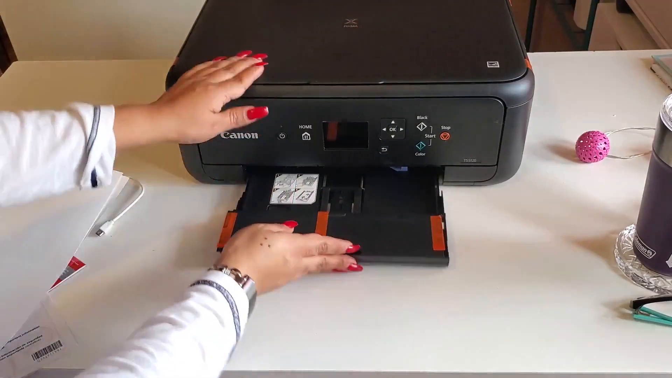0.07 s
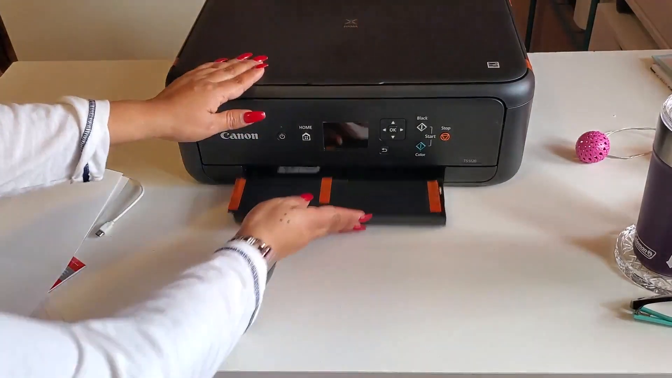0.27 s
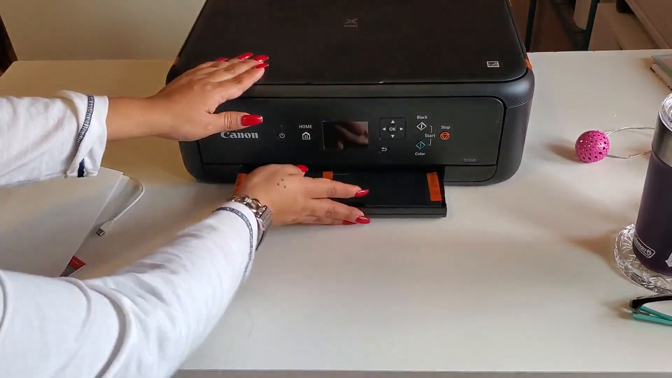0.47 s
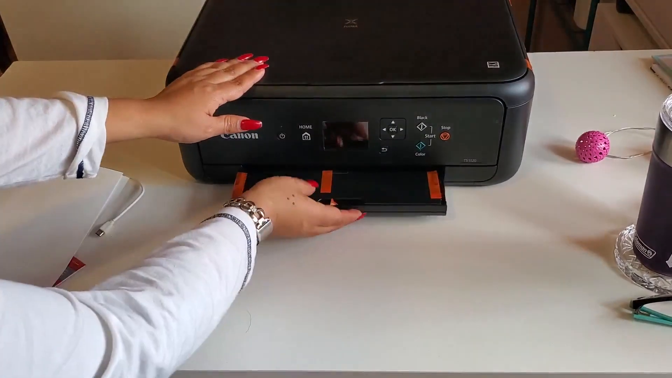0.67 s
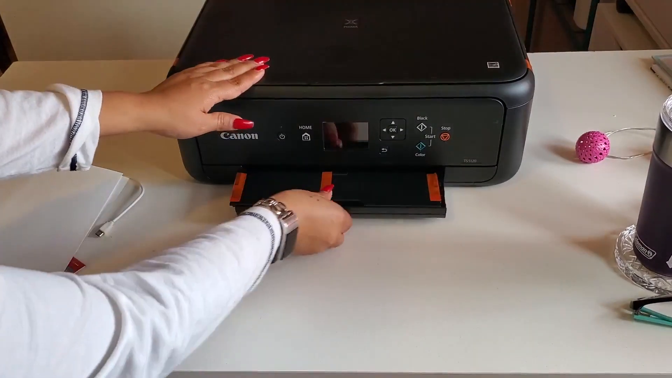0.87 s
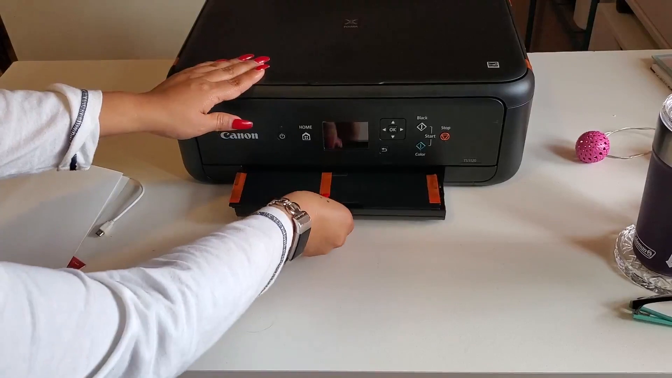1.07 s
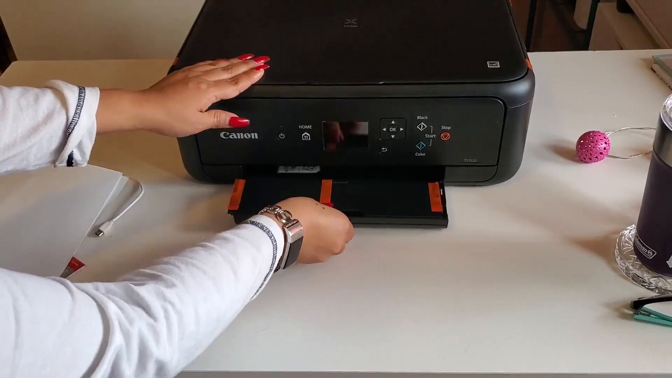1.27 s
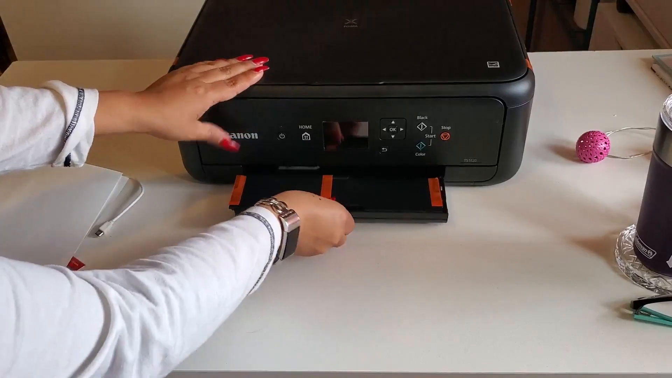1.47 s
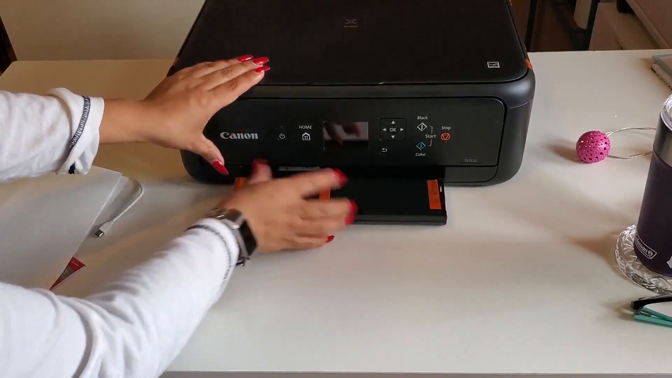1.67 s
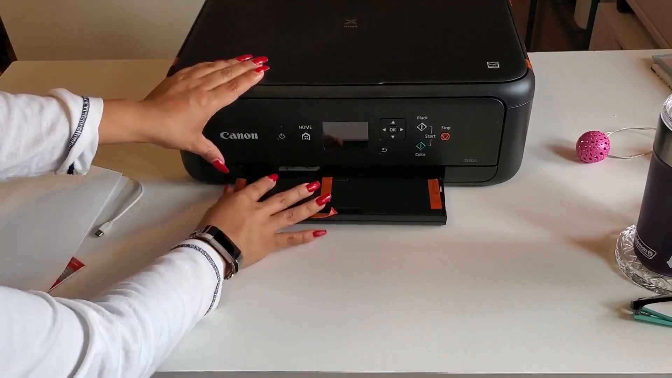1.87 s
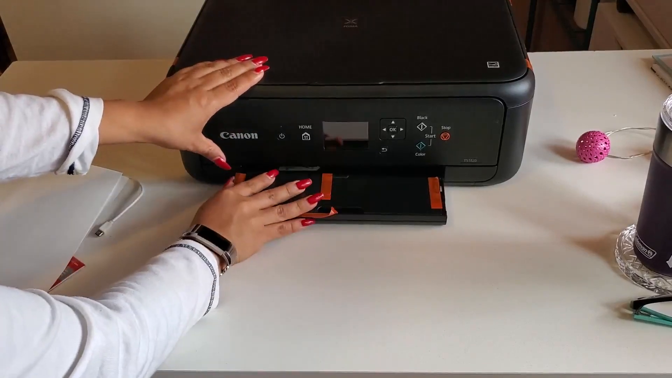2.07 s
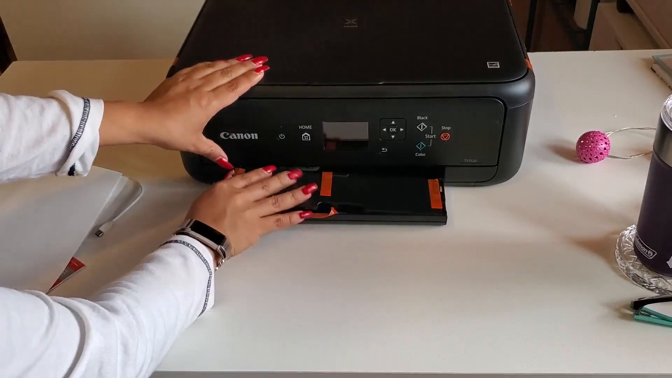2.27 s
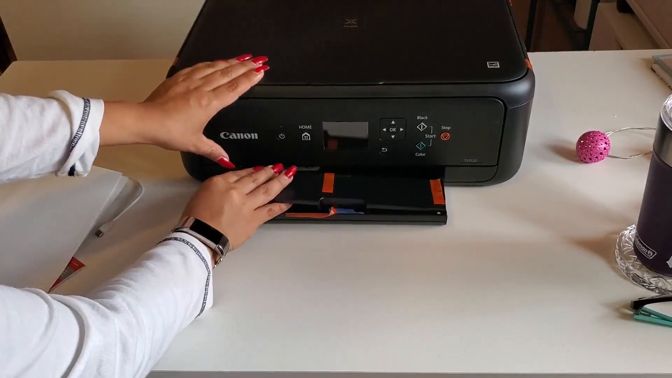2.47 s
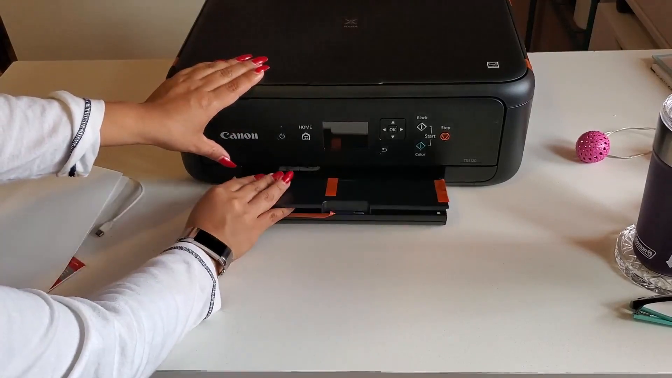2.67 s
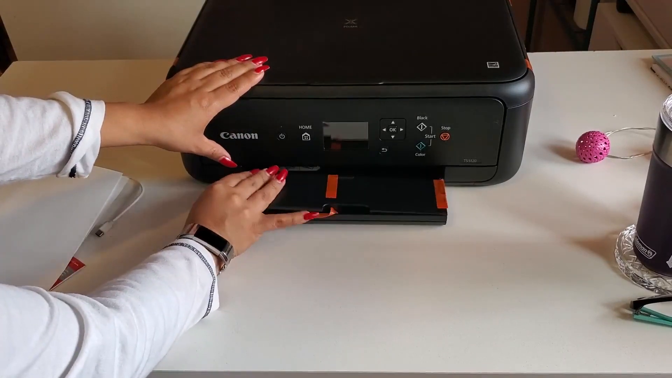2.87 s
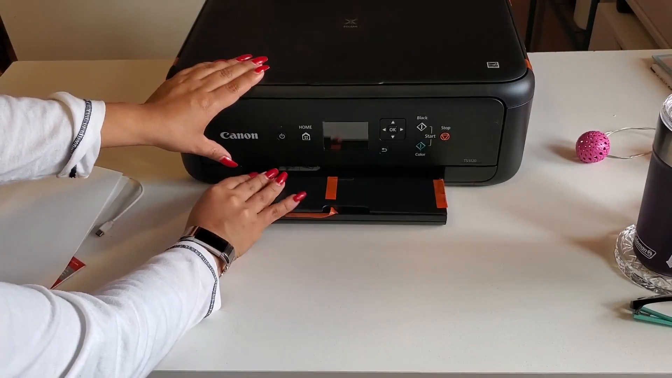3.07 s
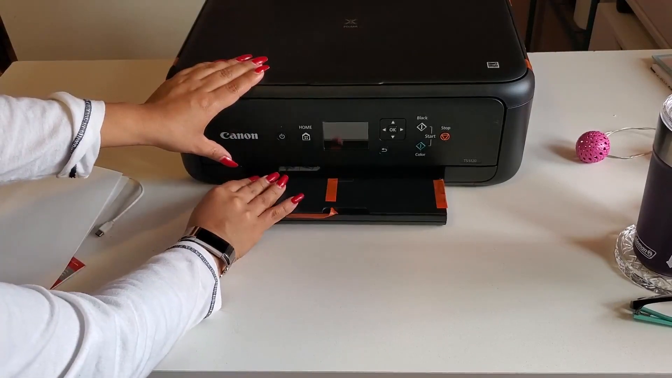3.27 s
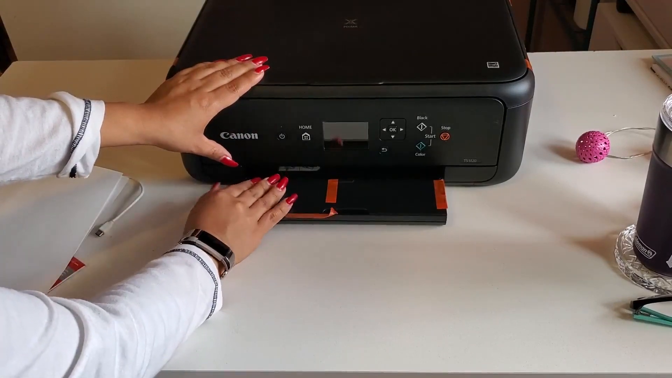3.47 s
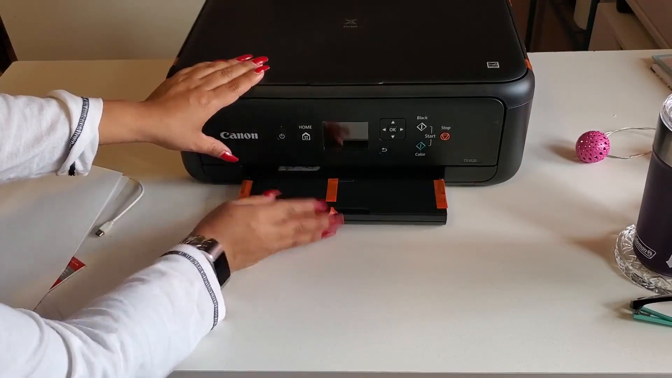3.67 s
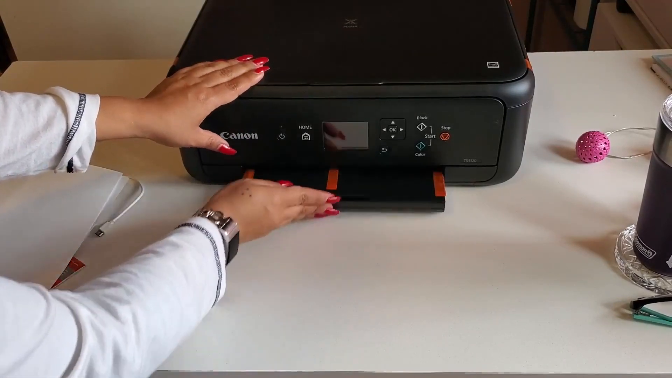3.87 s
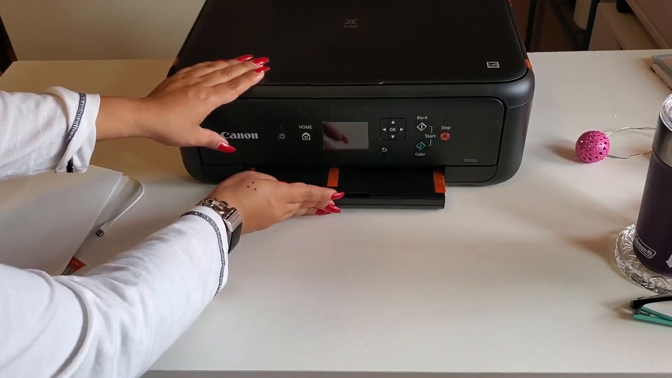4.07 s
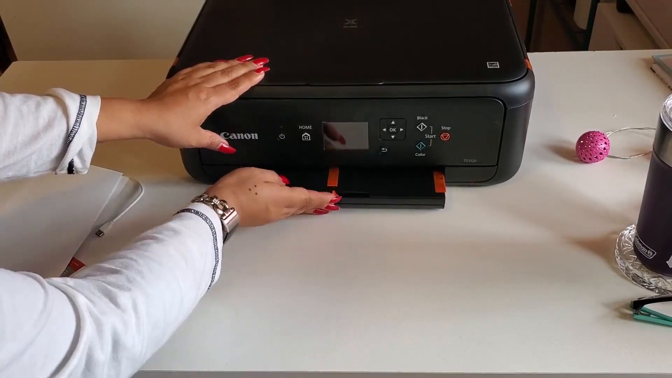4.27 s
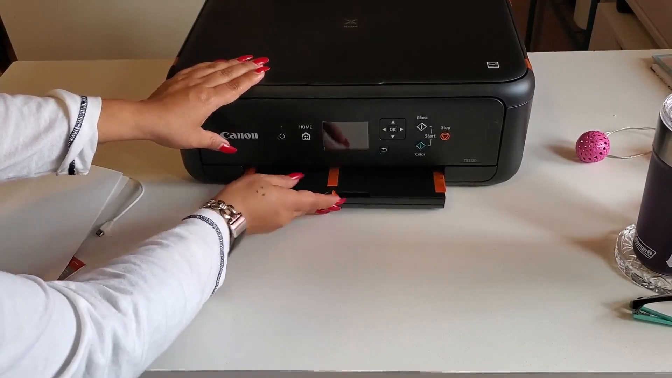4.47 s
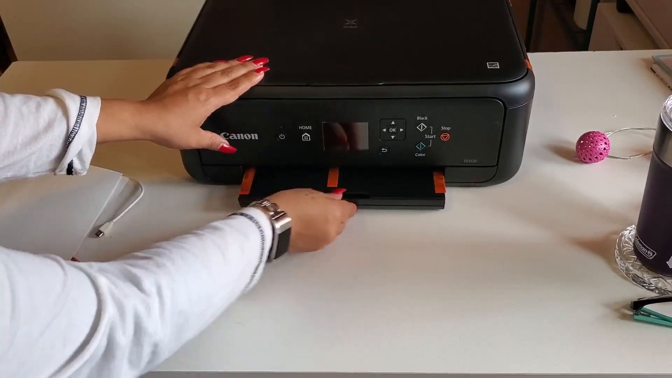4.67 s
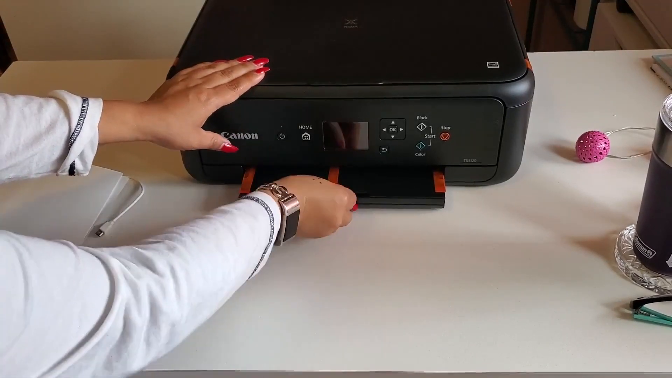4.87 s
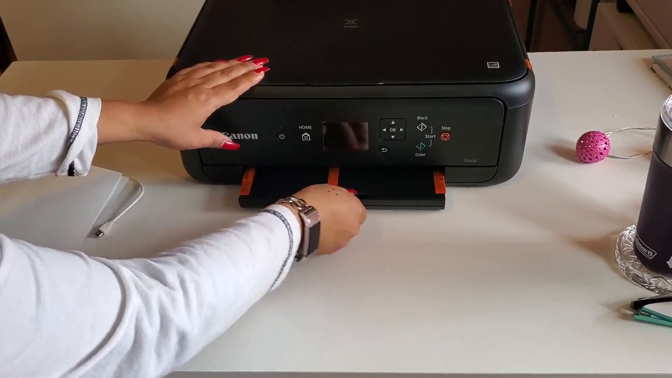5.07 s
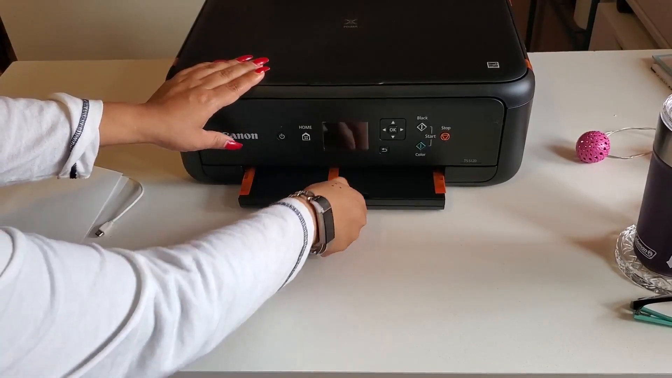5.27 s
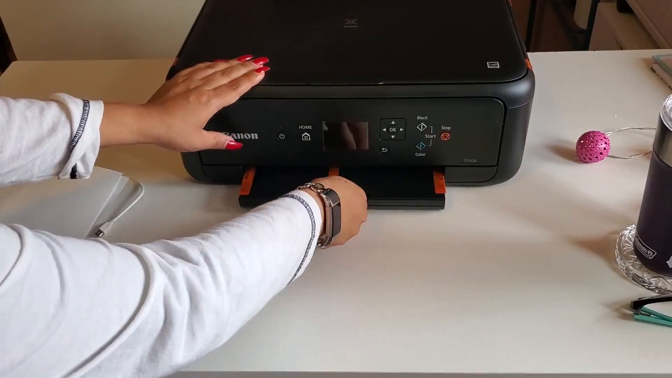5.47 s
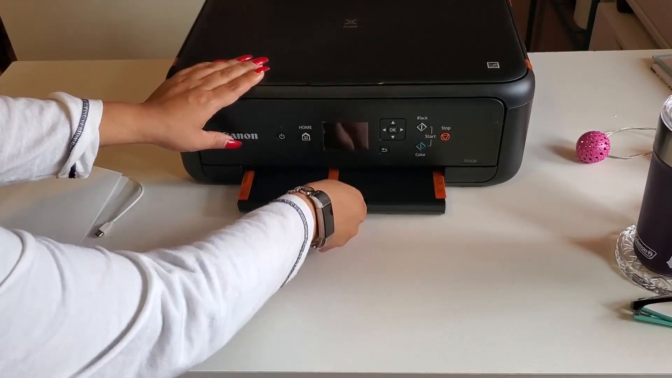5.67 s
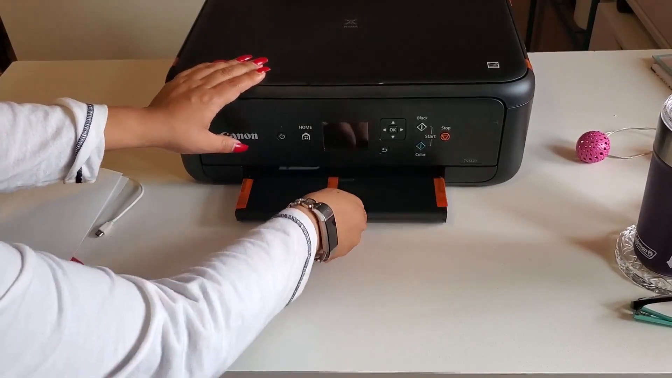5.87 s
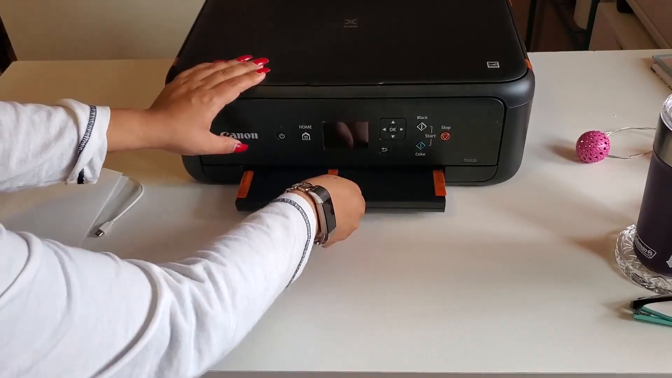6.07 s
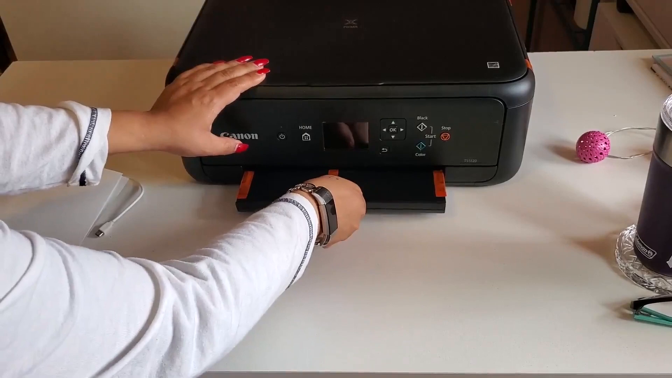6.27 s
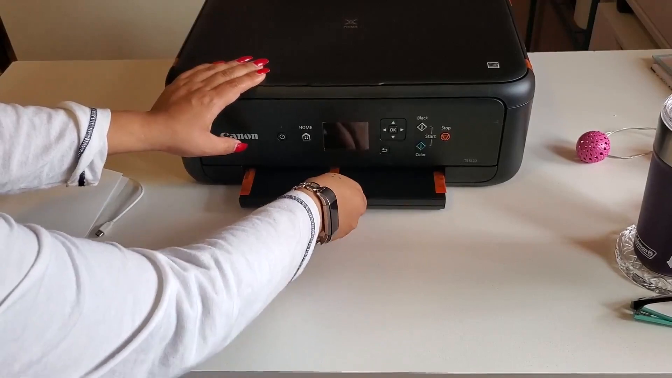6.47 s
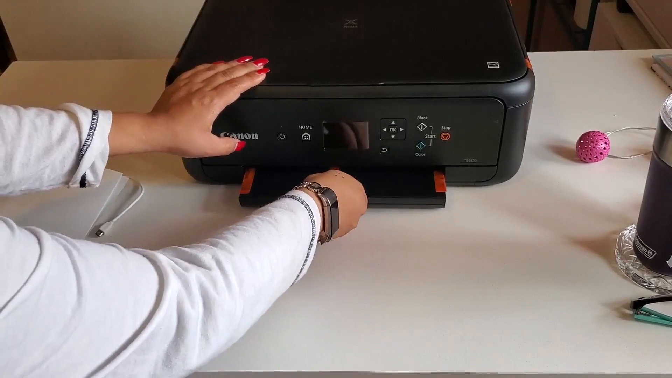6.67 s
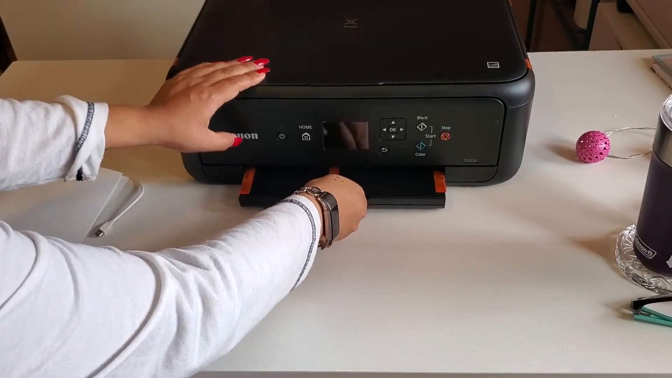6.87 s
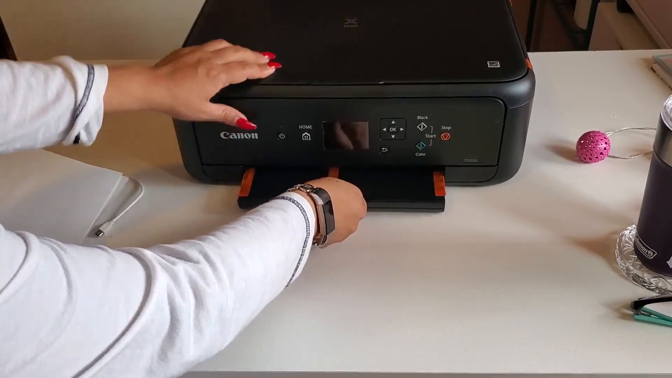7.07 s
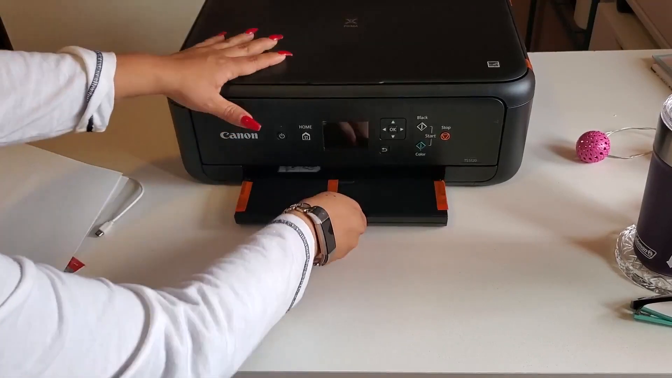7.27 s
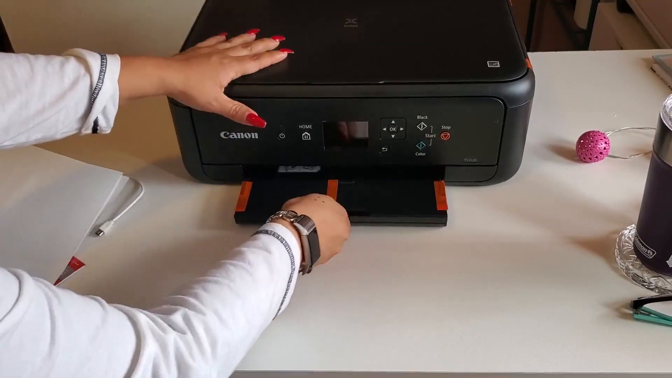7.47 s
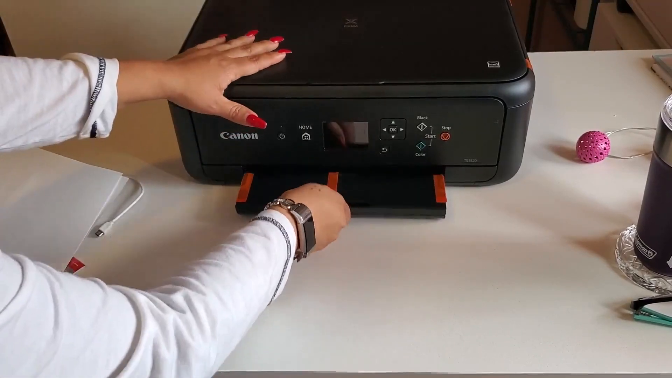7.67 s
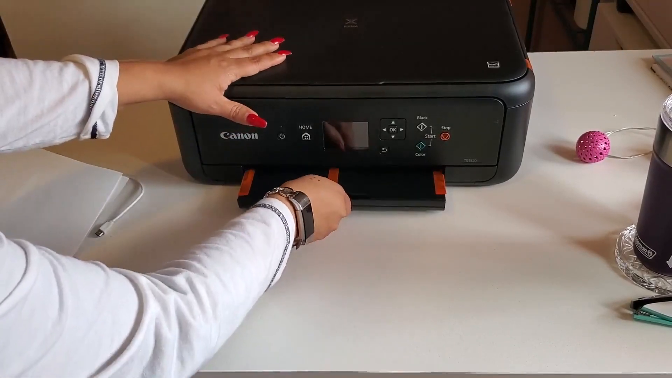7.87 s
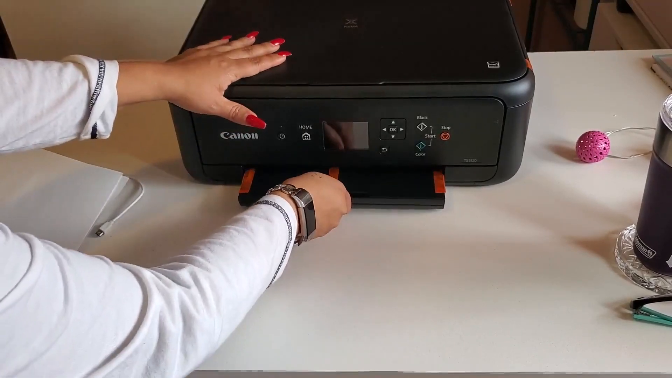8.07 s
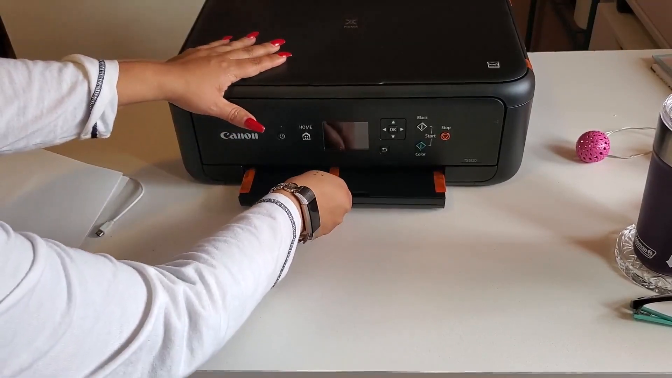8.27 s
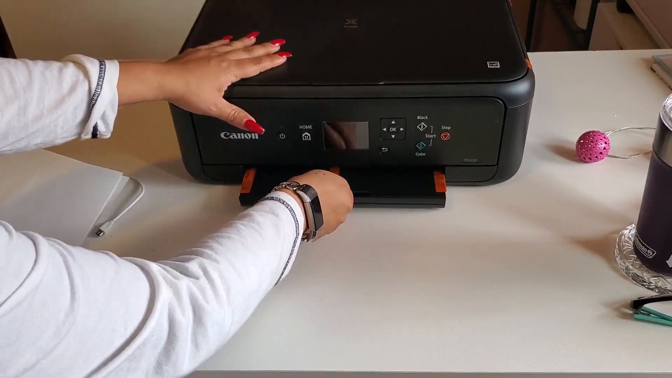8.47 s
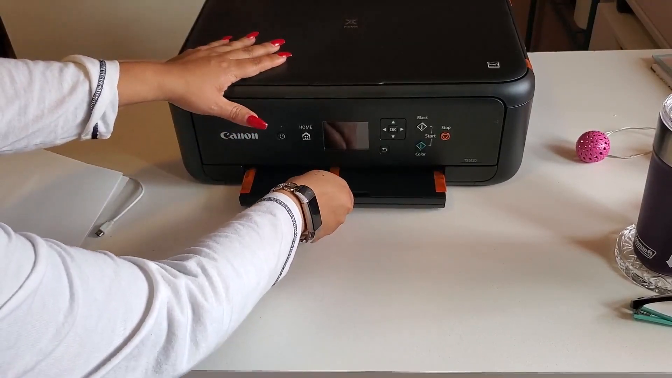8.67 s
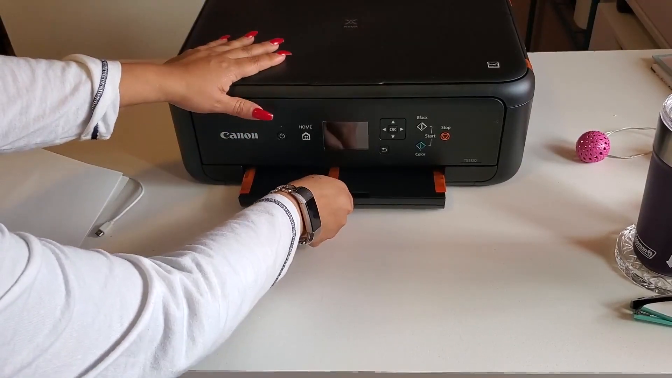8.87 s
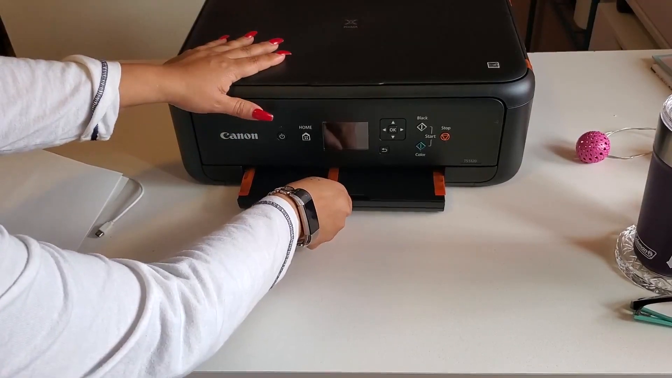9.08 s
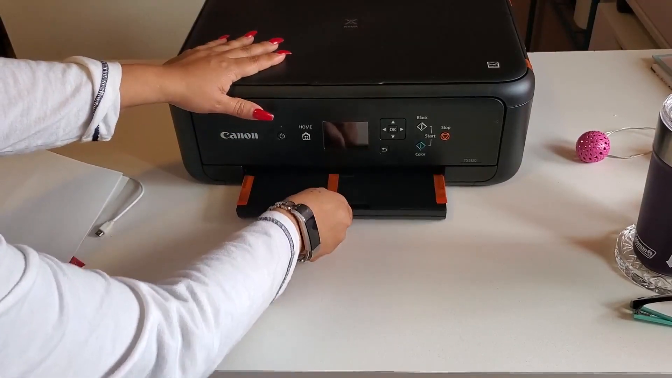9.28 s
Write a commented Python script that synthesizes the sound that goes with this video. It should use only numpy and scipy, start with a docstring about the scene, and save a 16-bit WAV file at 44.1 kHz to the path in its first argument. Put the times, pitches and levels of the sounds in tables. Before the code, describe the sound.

A hand works a desk printer's plastic paper tray in and out, with sharp clicks, rattly scrapes and soft desk thuds in a small room.

```python
"""Sliding a printer's paper tray

A hand slides the plastic paper tray of a desk printer in and out. Catches click: short pushes become cracks of noise.
The tray scrapes and rattles on: noise breaks into uneven grains. The desk thuds: low rings under a dull rumble.
A metal spring rings thinly, a faint tone comes from far away and an appliance hums low, as plain sine waves.
A small hard-walled room answers tray and desk with fading noise, over a bed of steady, coloured noise."""
import sys
import numpy as np
from scipy import signal
from scipy.fft import rfft, irfft, next_fast_len
from scipy.io import wavfile
from scipy.ndimage import uniform_filter1d, map_coordinates

SR = 44100
rng = np.random.default_rng(int(sys.argv[2]) if len(sys.argv) > 2 else 0)


def int16_out(signal):
    """Quantize to a 16-bit WAV file."""
    q = np.round(np.clip(np.atleast_2d(signal).T, -1, 1) * 32767)
    wavfile.write(sys.argv[1], SR, q.astype(np.int16))


N = 411012  # length of the scene in samples


def amp(db):
    """Turn dB into gain."""
    return 10 ** (np.asarray(db) / 20)


def unit(x):
    """Scale x to an average (rms) level of 1."""
    return x / np.sqrt(np.mean(x ** 2) + 1e-20)


def along(points, hz):
    """Read a curve of (frequency, value) points, with frequency on a log axis."""
    point_hz, values = np.transpose(points)
    return np.interp(np.log(hz + 1), np.log(point_hz + 1), values)


def wobble(rate):
    """A smooth random curve with `rate` new random points a second."""
    points = rng.standard_normal(int(N * rate / SR) + 4)
    return map_coordinates(points, [np.arange(N) * rate / SR])


def filtered(x, response):
    """Multiply the spectrum of x by a response that depends on frequency."""
    size = next_fast_len(x.shape[-1] + SR // 8)
    spectrum = rfft(x, size) * response(np.fft.rfftfreq(size, 1 / SR))
    return irfft(spectrum, size)[..., :x.shape[-1]]


def band(x, lo_hz, hi_hz):
    """Keep one frequency band, without looking ahead in time."""
    return signal.sosfilt(signal.butter(2, [lo_hz, hi_hz], "bandpass", fs=SR, output="sos"), x)


# How alike left and right are: (frequency [Hz], likeness [0 to 1])
LEFT_RIGHT_LIKENESS = [(50, 0.83), (250, 0.92), (500, 0.7), (1000, 0.084), (2000, 0.8), (4000, 0.027),
                       (12000, 0.031)]


def paired(noise, colour):
    """Mix two noises into left and right, whose likeness depends on frequency."""
    def mid_and_side(hz):
        angle = np.arccos(np.clip(along(LEFT_RIGHT_LIKENESS, hz), -1, 1)) / 2
        return colour(hz) * [np.cos(angle), np.sin(angle)]
    mid, side = filtered(noise, mid_and_side)
    return np.array([mid + side, mid - side])


# Colour of the room tone: (frequency [Hz], relative level per Hz [dB])
ROOM_TONE_COLOUR = [(12, -44.5), (20, -23.5), (53, 1), (81, -3), (120, -16), (300, -10), (450, -33),
                    (640, -19), (980, -26.5), (1700, -24), (2500, -39.5), (8000, -39), (11000, -49),
                    (16000, -63)]


def air():
    """Room tone: coloured noise whose level drifts a little."""
    noise = rng.standard_normal((2, N))
    room_tone = unit(paired(noise, lambda hz: amp(along(ROOM_TONE_COLOUR, hz))))
    return amp(-57 + 0.53 * wobble(1.5)) * room_tone


# Slow chance rise and fall of the low hum, under a quicker random waver: (time [s], rms level [dB])
HUM_LEVEL = [(0.0, -55), (0.34, -50.5), (1.53, -58), (1.89, -46), (2.18, -52), (2.86, -51.5), (3.37, -54.5),
             (3.58, -50), (4.18, -49.5), (4.46, -56.5), (4.93, -47), (5.76, -56.5), (6.23, -44),
             (6.51, -52.5), (8.85, -52.5), (9.32, -48.5)]


def hum():
    """The appliance: a low sine whose pitch and level waver."""
    pitch_hz = 72.9 + 1.07 * wobble(8.9)
    level_db = np.interp(np.arange(N) / SR, *np.transpose(HUM_LEVEL)) + 2.4 * wobble(13)
    return np.sqrt(2) * amp(level_db) * np.sin(2 * np.pi * np.cumsum(pitch_hz) / SR)


# A faint low tone from far away: (start [s], length [s], pitch [Hz], rms level before it sags [dB])
FAR_TONES = [(3.347, .38, 327, -52), (4.21, 0.33, 329, -52)]


def far_tone():
    """A faint sine that swells in, sags slowly and fades out."""
    attack_s, release_s, sag_db_per_s = 0.022, 0.064, 17.5
    t, out = np.arange(N) / SR, np.zeros(N)
    for start, length, hz, db in FAR_TONES:
        shape = np.clip(np.minimum((t - start) / attack_s, (start + length - t) / release_s), 0, 1)
        level = np.sqrt(2) * amp(db - sag_db_per_s * np.clip(t - start, 0, length))
        out += shape * level * np.sin(2 * np.pi * hz * t)
    return out


# A metal spring left ringing: (time [s], pitch [Hz], starting level [dB], time to fall by 60 dB [s])
SPRING_RINGS = [(3.994, 654, -41.5, 0.92), (3.998, 1205, -67.5, 0.56)]


def spring():
    """The thin ring of the spring: sines that die away evenly in dB."""
    t, out = np.arange(N) / SR, np.zeros(N)
    for start, hz, db, t60 in SPRING_RINGS:
        fade = amp(db - 60 * np.clip(t - start, 0, None) / t60) * (t > start)
        out += fade * np.sin(2 * np.pi * hz * t)
    return out


# Soft blows into the desk: (time [s], level [dB], pitch [Hz], rumble against the ring [dB])
DESK_BLOWS = [(0.028, -38, 78, 7.5), (0.265, -25.5, 102, -3.5), (1.556, -37, 95, -27), (1.697, -32, 75, 4),
              (1.992, -25.5, 83, -13.5), (2.381, -40, 72.7, 4), (4.007, -24.5, 129.5, -8.5),
              (4.766, -25, 83, -10.5), (4.839, -32.5, 102, -11.5), (5.934, -29, 163, -12),
              (6.083, -25, 98, -14), (6.328, -36, 83.4, 8), (6.709, -27, 99.2, -17.5),
              (7.763, -35.5, 163, 5), (8.475, -20, 100, -12), (8.488, -23, 89.2, -8)]


def thuds():
    """A soft blow rings the desk top low, with a duller rumble swelling above."""
    out, t = np.zeros(N + SR), np.arange(SR // 2) / SR
    for time, db, hz, rumble_db in DESK_BLOWS:
        ring = np.sin(2 * np.pi * hz * t) * amp(-60 * t / 0.097) * (1 - np.exp(-t / 0.002))
        noise = rng.standard_normal(len(t))
        dull = unit(band(band(noise, 170, 360), 170, 360))
        rumble = dull + amp(-19.5) * unit(band(noise, 590, 1000))
        swell = amp(rumble_db - 60 * t / 0.23) * (1 - np.exp(-t / 0.017))
        out[round(time * SR):][:len(t)] += amp(db) * (ring + rumble * swell)
    return band(out[:N], 45, 3000)


# Resonances of tray and casing: (pitch [Hz], width [Hz], relative level [dB])
SHELL_RESONANCES = [(240, 47, -8.5), (634.2, 31, 5.5), (1340, 15, -40.5), (1695, 46, 2), (3080, 14, -27.5),
                    (3537, 51, 1.5), (8630, 870, -11.5)]
# Colour that the plastic gives to sound: (frequency [Hz], level [dB])
PLASTIC_COLOUR = [(100, 4.5), (300, 0), (700, 3.5), (1500, 3), (3000, -0.5), (5000, -2.5), (8000, -7.5),
                  (11000, -7.5), (14000, 0), (16500, 1)]


def shell(x, ring_db):
    """The plastic body: a smooth causal colour with the resonances on top."""
    def response(f):
        # folding the cepstrum makes the colour answer only after the push, never before it
        cepstrum = irfft(np.log(amp(along(PLASTIC_COLOUR, f))))
        half = len(cepstrum) // 2
        cepstrum[1:half] *= 2
        cepstrum[half + 1:] = 0
        colour = np.exp(rfft(cepstrum))[:len(f)]
        modes = 0
        for k, (hz, width, db) in enumerate(SHELL_RESONANCES):
            resonance = 1j * f * width / (hz * hz - f * f + 1j * f * width)
            modes = modes + (-1) ** k * amp(db) * resonance
        return colour * (1 + amp(ring_db) * modes)
    return filtered(x, response)


# Scrapes and rattly after-sounds of the tray, each growing or fading evenly, at relative levels:
# (start [s], end [s], first level [dB], last level [dB], hollow part [dB], sharp part [dB])
TRAY_SCRAPES = [(0, 0.032, -29, -42, 1, -7), (0.037, 0.174, -41, -46.5, -6.5, -10.5),
                (0.192, 0.213, -35.5, -24.5, -10.5, -5), (0.237, 0.283, -23, -24.5, -6.5, -10),
                (0.602, 0.742, -35, -61, -1, -14.5), (0.765, 0.808, -44, -38, -6.5, -11.5),
                (0.822, .91, -39, -63, -4.5, -12), (0.928, 0.998, -48, -64, -15, -14),
                (1.077, 1.278, -45, -75, -5, -14), (1.548, 1.623, -44.5, -34, -12.5, -15.5),
                (1.621, 1.634, -35.5, -19.5, -5.5, -10), (1.638, 1.739, -21, -33.5, -13, -11.5),
                (1.737, 1.94, -38.5, -54, -5.5, -13), (2.244, 2.339, -56, -59, -16, -8.5),
                (2.506, 2.669, -58.5, -64.5, -13, 1.5), (2.68, 2.734, -58, -49, -0.5, -3),
                (2.757, 2.835, -47.5, -62, -4, -7), (2.867, 2.995, -39.5, -74, 0, -17),
                (3.479, 3.687, -37.5, -60, -3.5, -11.5), (3.736, 3.81, -50.5, -46.5, -6.5, -3),
                (3.814, 3.875, -41, -46, 0, -13), (3.865, 3.919, -44, -35, -7, -13),
                (3.923, 3.992, -37.5, -44.5, -2, -10.5), (4.541, 4.624, -45, -68, -5, -8.5),
                (4.646, 4.8, -47, -63.5, -7, -10.5), (4.924, 5.103, -59, -33, -3.5, -16),
                (5.359, 5.498, -47.5, -78.5, 2, -9.5), (5.52, 5.68, -70.5, -52.5, -4, -13.5),
                (5.7, 5.838, -37.5, -48.5, 3.5, -13.5), (5.842, 5.941, -47.5, -30.5, 0, -14.5),
                (5.954, 5.974, -19, -20, -5.5, -7.5), (5.98, 6.014, -15.5, -36.5, -4.5, -11.5),
                (6.289, 6.322, -52.5, -29.5, 3.5, -15), (6.325, 6.373, -27, -26, -1.5, -13),
                (6.959, 7.025, -52.5, -51, -9, -16), (7.032, 7.111, -57.5, -29.5, -2.5, -11),
                (7.255, 7.397, -37.5, -73, -2.5, -17), (7.444, 7.529, -38.5, -71.5, -3, -20.5),
                (7.537, 7.701, -58.5, -56.5, 2.5, -9), (7.709, 7.761, -53, -29.5, -6, -12),
                (7.762, 7.86, -30, -43, -4.5, -12), (7.86, 7.958, -37, -50, -4, -14.5),
                (7.984, 8.188, -32.5, -66, 1, -8.5), (8.357, 8.425, -60, -78.5, 4, -12),
                (8.48, 8.647, -57, -73, 5, -9.5), (8.821, 8.887, -53.5, -68.5, 2, -13.5),
                (8.907, 9.001, -59, -54, 4, -9.5), (9.0, 9.113, -68, -58, 5, -12)]


def scrape():
    """Stick and slip: noise broken into grains of very uneven size; left, right and the feed to the room."""
    t, gains = np.arange(N) / SR, np.zeros((3, N))  # gain of the middle, hollow and sharp parts
    for start, end, first_db, last_db, hollow_db, sharp_db in TRAY_SCRAPES:
        at = slice(round(start * SR), round(end * SR))
        level_db = np.interp(t[at], [start, end], [first_db, last_db])
        gains[:, at] += amp(level_db + np.array([[0], [hollow_db], [sharp_db]]))
    gains = uniform_filter1d(gains, size=300)  # rounds off the start and end of each sound

    grip = amp(5.46 * wobble(350) + 4 * wobble(70) + 1.4 * wobble(12))
    # sudden slips stand out of the rubbing
    slips_per_s, slip_db, slip_spread_db, slip_t60_s = 140, 4, 5, 0.012
    slips = (rng.random(N) < slips_per_s / SR) * amp(slip_db + slip_spread_db * rng.uniform(-1, 1, N))
    slip_fade = amp(-60 * t[:SR // 20] / slip_t60_s)
    grip = grip * (1 + signal.fftconvolve(slips, slip_fade)[:N])

    noise = paired(rng.standard_normal((2, N)), np.ones_like)
    rub = shell(grip * noise, ring_db=4)
    hollow = unit(band(rub, 160, 900))
    middle = unit(band(rub, 1000, 7000))
    sharp = unit(band(rub, 6500, 11500))
    left, right = (gains[0] * middle + gains[1] * hollow + gains[2] * sharp) / 2
    return np.array([left, right, left])


# Contacts of tray, catches and fingernails, before the drive below sets the level of each register:
# (time [s], push [dB], hollowness [dB], brightness [dB], pan left-right [dB], panel pitch [Hz],
#  crack over room [dB])
CONTACTS = [(.0414, -16.5, -7, -11, -2.5, 1410, 1.5), (.0744, -17.5, -8, -10, 1.5, 2040, 0.5),
            (.1468, -38, 5.5, -4, -1.5, 1896, 0.5), (.1825, -13.5, 0.5, -8, -1, 1230, 1.5),
            (.2115, -6, -10, -6, 0.5, 1200, -5), (.2214, -6, -5.5, -8, -5.5, 1260, 0.5),
            (.2989, -1, -5.5, -6.5, -4, 1940, -3), (.3061, -13.5, 1, -15, -5.5, 2000, 9),
            (.5464, -24.5, -20, -18, -5, 3150, 1.5), (.5877, -21, -2.5, -12.5, -2.5, 1790, -1),
            (.7694, -28.5, -3, -10, -1.5, 1440, -6.5), (.8024, -27.5, -15, -3, -.5, 1430, 3.5),
            (1.0669, -23.5, -14, -21, -1, 2380, 4.5), (1.1339, -31.5, -3, -13.5, 0.5, 1420, 6),
            (1.5506, -27, -19, -14.5, -6, 2930, -4), (1.5774, -25, -17, -10.5, -4, 1620, -5.5),
            (1.617, -39.5, -23.5, 4.5, 0, 1700, 5), (1.6428, -4.5, -13, -7.5, 0, 1460, 2),
            (1.7137, -1, -18.5, -12, 1, 1730, -.5), (1.8519, -25, -8, -11, 3, 1410, 10),
            (1.8694, -26, -8.5, -7.5, -2, 1590, 7.5), (1.944, -32, -12.5, 0.5, 5.5, 3070, 2),
            (2.146, -37.5, -18.5, -16.5, -6, 1650, -4.5), (2.2352, -29, -21.5, -11.5, 1, 1500, 1),
            (2.2676, -42.5, -21.5, 0.5, 6, 3070, -6), (2.329, -44.5, -18, -4.5, 1, 1710, 5),
            (2.3473, -20.5, -16.5, -10.5, 0.5, 1420, -4), (2.37, -14.5, -6, -4.5, 3, 2530, 1),
            (2.5592, -37.5, -8, -6, 1.5, 1600, 7), (2.616, -37.5, -1, -8, -1, 2760, 3.5),
            (2.6795, -37.5, -17, -0.5, 0, 1740, -10.5), (2.6868, -32, -6, -4, 0.5, 1700, 5),
            (2.7393, -25.5, -2.5, -4.5, .5, 2630, 6), (2.8571, -20.5, -9, -12, 2, 2720, 1),
            (2.868, -27, -19, -14.5, -6.5, 1525, 10.5), (3.1473, -40.5, -11, -13, -1.5, 1850, 3),
            (3.255, -36.5, -0.5, -21, -2.5, 1260, 5), (3.3816, -4, -21.5, -10, 1.5, 1550, 0),
            (3.3883, -16, -9, -25, -2.5, 1640, 11.5), (3.3942, -12.5, -7, -10, -3, 1455, 7),
            (3.5321, -22, -3.5, -12, -11, 1400, -1), (3.564, -24, -19, -15.5, 2.5, 1500, 6),
            (3.7215, -33, -23, -10.5, -1, 1600, 5), (3.7606, -39, -22, 7, 3.5, 1770, 7),
            (3.8067, -26.5, 6.5, -12, 3, 1400, 2), (3.8239, -34, -15, -12.5, -1.5, 1420, 7.5),
            (3.8786, -16.5, -4.5, -13.5, -1.5, 1320, -6), (3.9956, -5.5, -5.5, -7, 6.5, 2120, -1),
            (4.0068, -9.5, -8, -8, 4.5, 1430, 3.5), (4.5126, -53, -14, -2, 0.5, 1620, 2),
            (4.5381, -40.5, -3, -1, 1, 1710, 2.5), (4.5515, -28.5, -9, -6.5, 5, 2250, 2),
            (4.5825, -34, -8, -12.5, 6.5, 2260, 7), (4.6334, -32, -12, -16.5, 0, 1720, 1.5),
            (4.6638, -31.5, -7, -14.5, -2, 1640, -1), (4.7173, -41.5, -26, 7, 1.5, 2720, 7),
            (4.9105, -36.5, -9, -18.5, -3.5, 1640, 4.5), (4.9897, -37.5, 3, -4, 5, 1700, 2),
            (4.997, -33.5, 6.5, -3, 0, 2010, -0.5), (5.1065, -15, -6.5, -5, 2.5, 2690, 3),
            (5.3088, -31.5, -23, -13.5, 2.5, 1680, 2), (5.3233, -25.5, -5, -6.5, 0, 1670, 6),
            (5.5179, -41, -13, -9, 1, 2050, 0), (5.6888, -2, -16, -12, 6, 2500, -4),
            (5.9342, -2, -7, -12.5, -3.5, 1650, -3), (5.9757, -7, -6, -14, 2.5, 1670, 5.5),
            (6.321, -9, -10, -12, -6, 1930, -5), (6.36, -15, -13, -11.5, -6, 1550, 3),
            (6.3788, -6.5, -4.5, -6, 6, 1510, .5), (6.9566, -27, -21, -30, -4, 1310, 5),
            (6.99, -35, -8, -12.5, 6.5, 1330, 3.5), (7.0299, -29.5, -3, -15.5, 5, 1580, -10),
            (7.1062, -.5, -18, -11.5, 2.5, 2056, -2.5), (7.4058, -29, -12, -16, -1, 3160, -2),
            (7.4315, -32.5, -21, -13, 5.5, 1720, -3), (7.446, -22, -14.5, -29.5, 1.5, 1585, 7),
            (7.5423, -36, -21, -3, -1.5, 3120, 6.5), (7.6131, -30, -0.5, -17.5, 5.5, 1580, -2.5),
            (7.7308, -17, -7.5, -17.5, -0.5, 1400, -4.5), (7.7614, -17.5, -3.5, -16.5, 3, 1470, 9.5),
            (7.7657, -8, -5.5, -14.5, -9, 1830, -11), (7.972, -7.5, -10, -6.5, 5.5, 1464, 1),
            (8.3439, -33, -4, -33, -1.5, 1370, 0), (8.4806, -34.5, 1, -38, -9, 1830, -16),
            (8.6442, -46, 1, -17, -12, 1550, 0), (8.8103, -32.5, 0, -21.5, -5, 1400, 2),
            (8.8985, -40, -14, -6.5, 2.5, 1450, 3.5), (8.9572, -35, -10, -9, -0.5, 2110, 4),
            (9.0704, -36, -5, -25, -12, 1580, -2.5), (9.1357, -3.5, -20, -8.5, -2, 2100, -1.5)]
# Knock, box, body, tick, edge and sparkle: (low edge [Hz], high edge [Hz])
CLICK_REGISTERS = [(130, 450), (450, 1100), (1100, 3000), (3000, 7000), (7000, 11000), (11000, 19000)]
# Part of a crack that both microphones share, one value per register: (weight [ratio])
SHARED_CRACK = [0.5, 11, 0.1, 0.083, 0.22, 0.34]
# Each register has its own drive, which balances knock, box, body, tick, edge and sparkle; hard pushes and
# those facing the left microphone sparkle more. One row per register: (drive [dB], change per dB of
# push [dB/dB], of hollowness [dB/dB], of brightness [dB/dB], of pan [dB/dB])
REGISTER_DRIVE = [(14, 1, 0.75, 0, 0), (17.1, 1, 0.96, 0.11, 0), (10.2, 1, 0.029, 0, 0),
                  (22.94, 1, 0.05, 0.93, 0.21), (18.1, 1, 0, 1.165, 0.099), (8.9, 1.16, 0.057, 0.85, 0.95)]
# Treble is aimed more than bass, one value per register: (share of the pan [ratio])
REGISTER_PAN = [.3, .6, .8, 1.1, 1.4, 1.6]


def crack_noise(t, pan_db, crack_db):
    """Nearby surfaces scatter a push into noise that differs from ear to ear; one pair per register."""
    noise = rng.standard_normal((3, len(t)))
    bounces = rng.standard_normal(len(t) // 60 + 1)
    rattle = amp(2.8 * np.repeat(bounces, 60)[:len(t)])  # loose parts chatter in uneven small impacts
    snap = amp(11 - 60 * t / 0.005)  # the first instant of a contact stands over the crack
    fall = snap + amp(-60 * t / 0.04) + rattle * amp(-11 - 60 * t / 0.14)
    fall = fall * (1 - np.exp(-t / 0.0004))
    crack = (noise[:2] + np.multiply.outer(SHARED_CRACK, noise[2:])) * fall
    crack = crack / np.linalg.norm(crack, axis=2)[..., None]
    pan = np.multiply.outer(REGISTER_PAN, [[pan_db / 2], [-pan_db / 2]])
    return crack * amp(crack_db + pan)


def clicks():
    """Each contact is one sharp push, heard as a crack with two short rings; left, right and room feed."""
    t = np.arange(SR // 20) / SR
    parts = np.zeros((len(CLICK_REGISTERS), 3, N + SR))  # left crack, right crack, bare push for the room
    for time, db, hollow_db, bright_db, pan_db, hz, crack_db in CONTACTS:
        start = round(time * SR)
        gains = amp(np.dot(REGISTER_DRIVE, [1, db, hollow_db, bright_db, pan_db]))
        crack = crack_noise(t, pan_db, crack_db)
        parts[:, :2, start:][..., :len(t)] += gains[:, None, None] * crack
        parts[:, 2, start] += gains
        # the panel that was touched rings briefly, and a small tab rings higher
        panel = np.sin(2 * np.pi * hz * t) * amp(db - 16.5 - 60 * t / 0.027)
        tab_hz = rng.uniform(3000, 7000)
        tab = np.sin(2 * np.pi * tab_hz * t) * amp(db + bright_db - 1 - 60 * t / 0.011)
        parts[3, :, start:][:, :len(t)] += tab * amp([[crack_db], [crack_db], [-12]])
        parts[2, :, start:][:, :len(t)] += panel * amp([[crack_db], [crack_db], [-9]])
    mix = np.zeros((3, N))
    for k, edges in enumerate(CLICK_REGISTERS):
        mix += (-1) ** k * band(parts[k, :, :N], *edges)  # every other register is flipped
    return shell(mix, ring_db=6.0)


# How long the room rings: (frequency [Hz], time to fall by 60 dB [s])
ROOM_DECAY = [(80, 0.64), (260, 0.33), (700, 0.38), (1840, 0.37), (4850, 0.36), (12800, 0.31)]


def room(x):
    """Each frequency dies at its own speed; the tray moves, so every stretch gets a new tail."""
    step, delay = SR * 2 // 5, 200  # samples
    out = np.zeros((2, N + 2 * SR))
    for at in range(0, N, step):
        hz, t, grains = signal.stft(rng.standard_normal((2, SR // 2)), SR, nperseg=128)
        fade = amp(-60 * t / along(ROOM_DECAY, hz)[:, None])
        fading_noise = signal.istft(grains * fade, SR, nperseg=128)[1]
        tail = paired(fading_noise, np.ones_like)
        wet = signal.fftconvolve(x[None, at:at + step], tail / np.linalg.norm(tail[0]), axes=1)
        out[:, at + delay:][:, :wet.shape[1]] += wet
    return out[:, :N]


def scene():
    """Tray and desk, direct and through the room, over the background."""
    background = air() + hum() + far_tone() + spring()
    desk = thuds()
    tray = scrape() + clicks()
    echo = amp(4.0) * room(tray[2] + amp(-5) * desk)
    return background + desk + tray[:2] + echo


def record(dry):
    """The right microphone hears less treble; nothing is kept above the band limit."""
    top_hz, slope_hz = 16000, 400  # middle and width of the slope at the band limit
    tilt_points = [(400, 0.03), (1200, -1.1), (2500, -0.37), (8000, 1.0), (14000, 0.98)]  # (Hz, dB)

    def response(hz):
        tilt_db = along(tilt_points, hz)
        kept = np.clip((top_hz + slope_hz / 2 - hz) / slope_hz, 0, 1)
        return amp([tilt_db, -tilt_db]) * np.sin(np.pi / 2 * kept) ** 2
    return filtered(dry, response)


dry = scene()
out = record(dry)
int16_out(out)
```